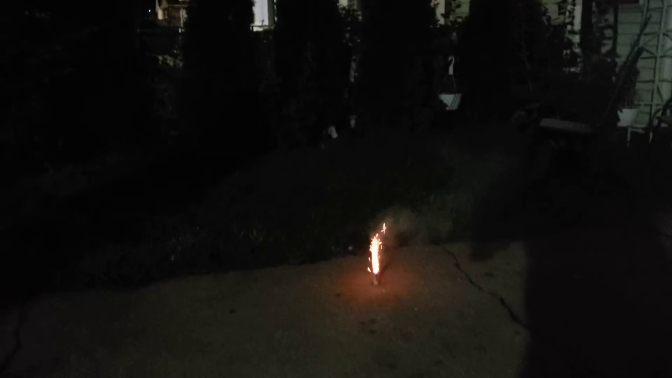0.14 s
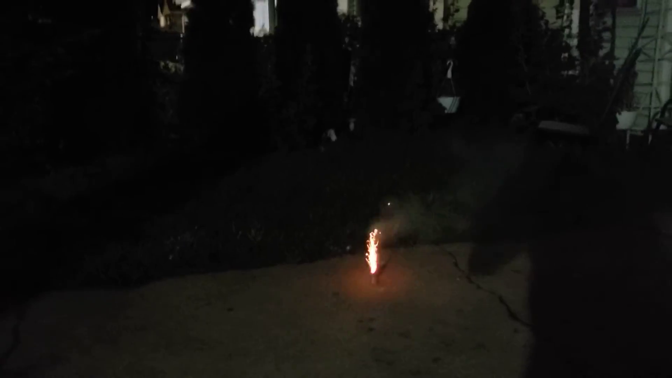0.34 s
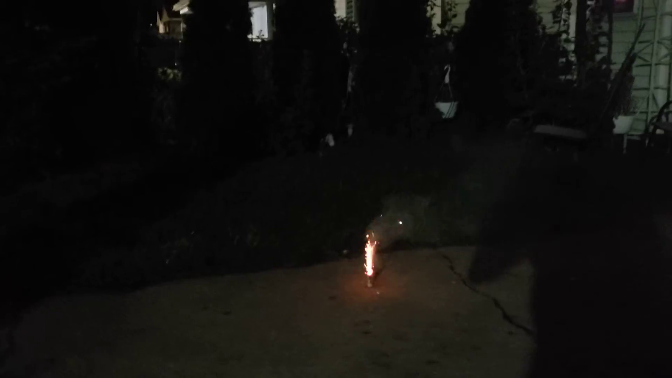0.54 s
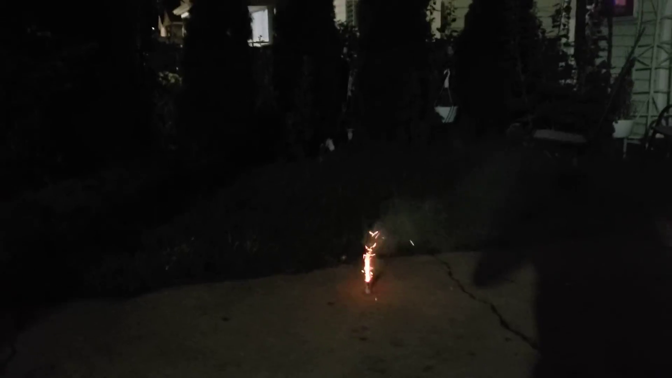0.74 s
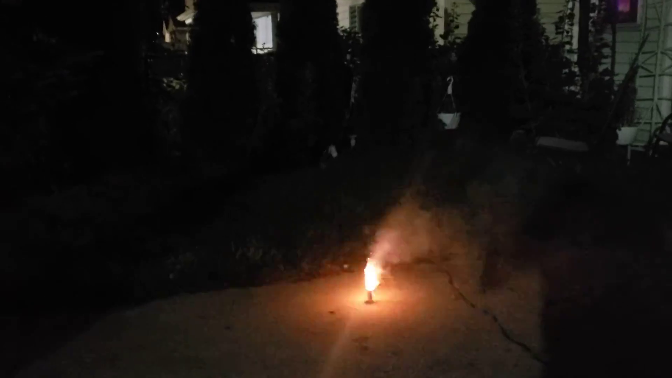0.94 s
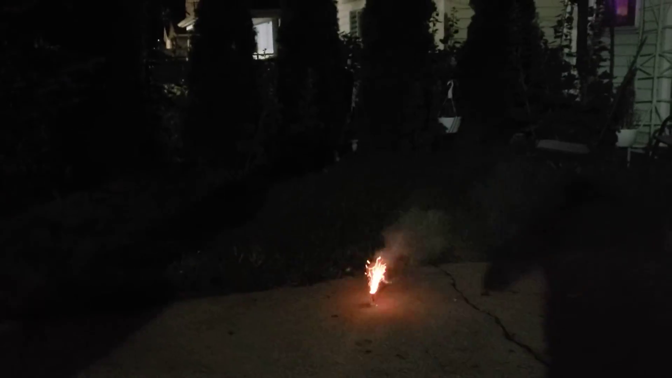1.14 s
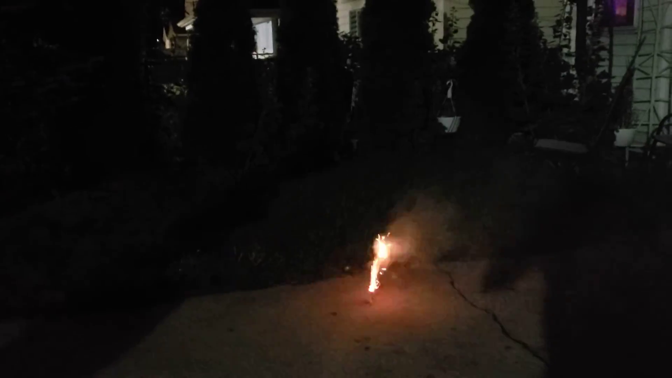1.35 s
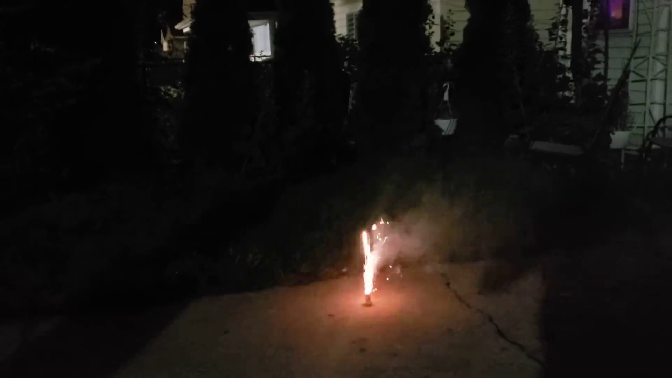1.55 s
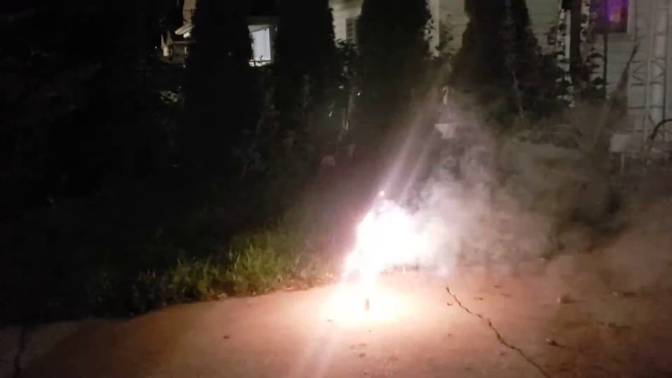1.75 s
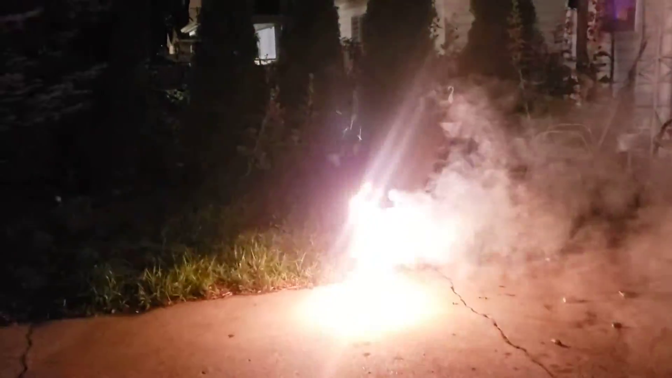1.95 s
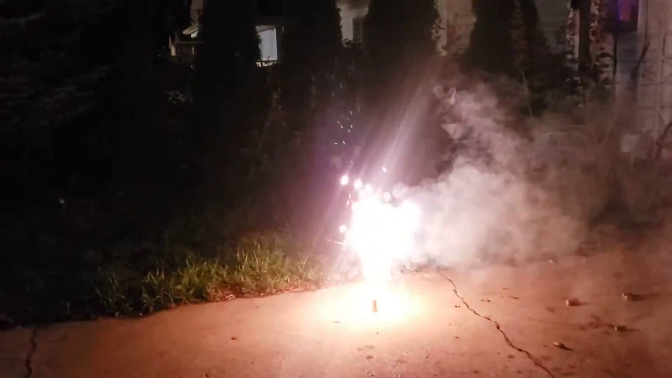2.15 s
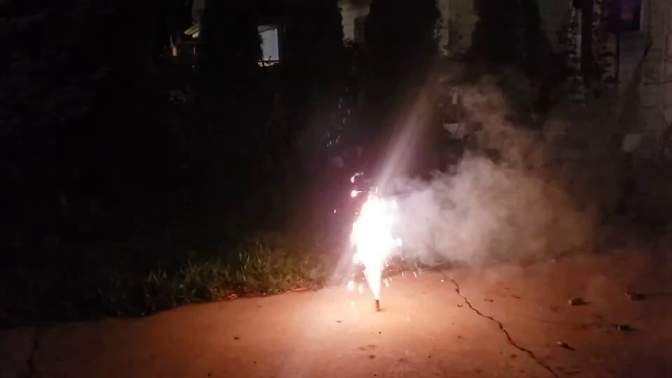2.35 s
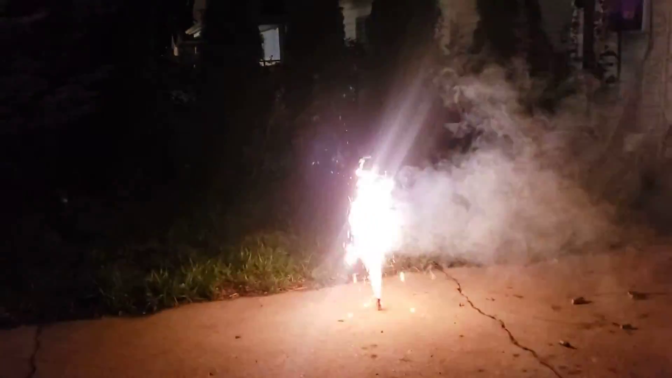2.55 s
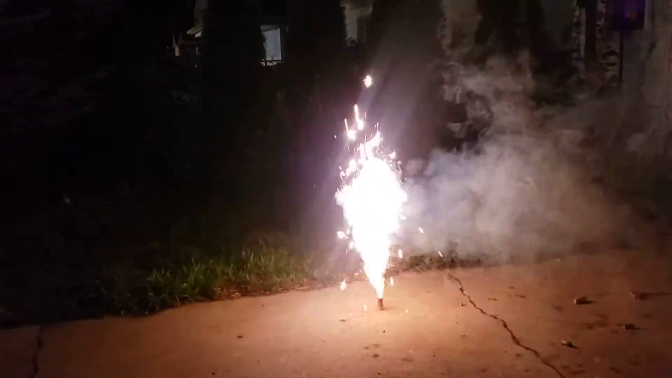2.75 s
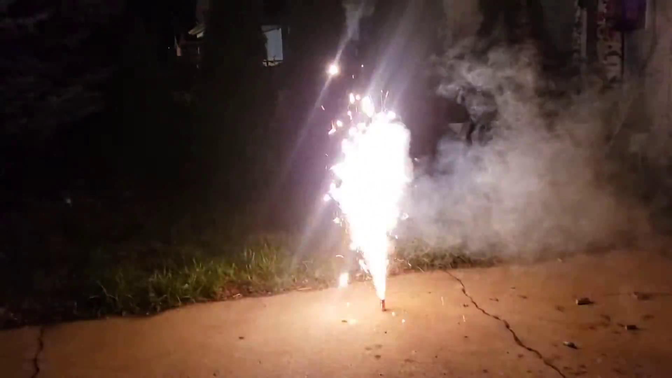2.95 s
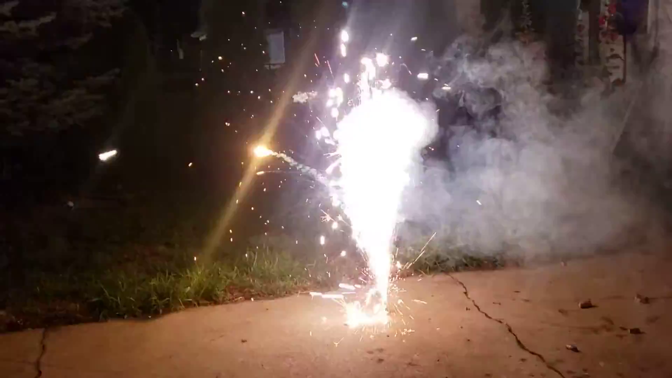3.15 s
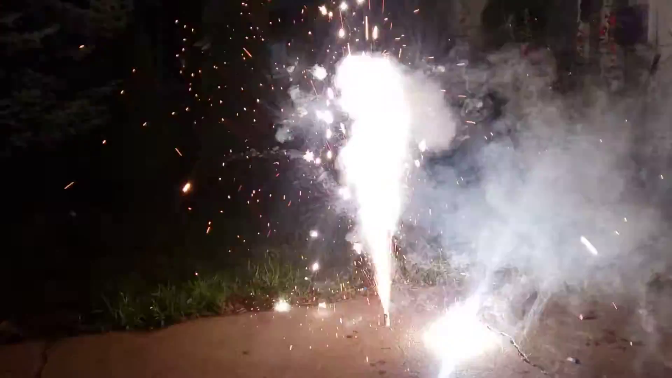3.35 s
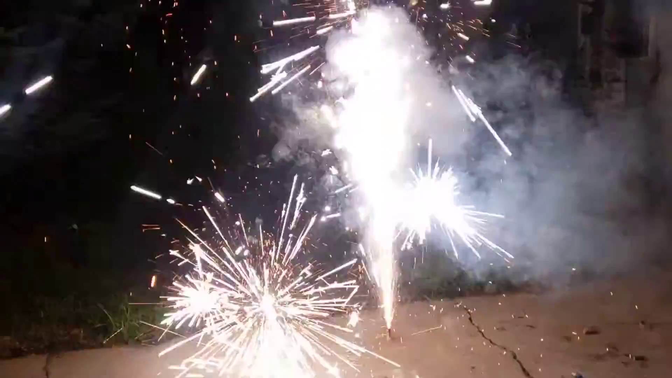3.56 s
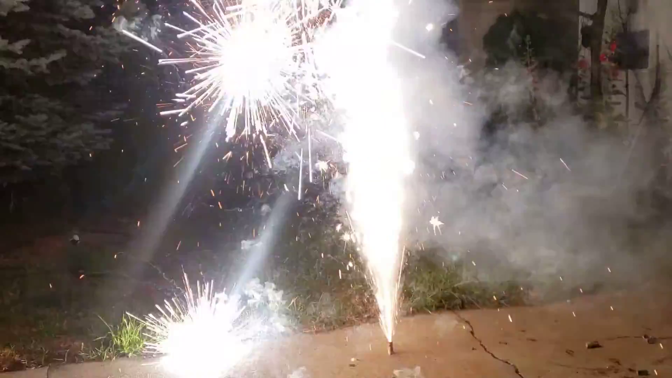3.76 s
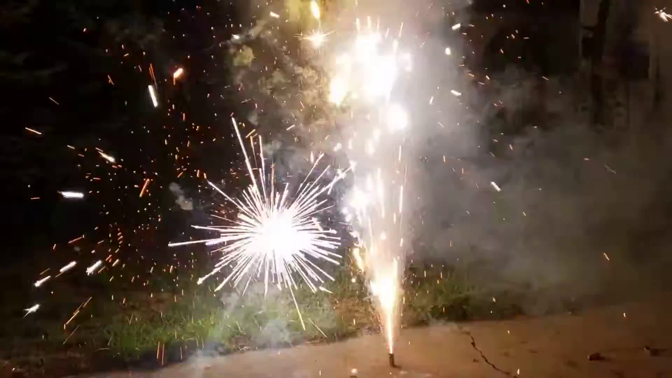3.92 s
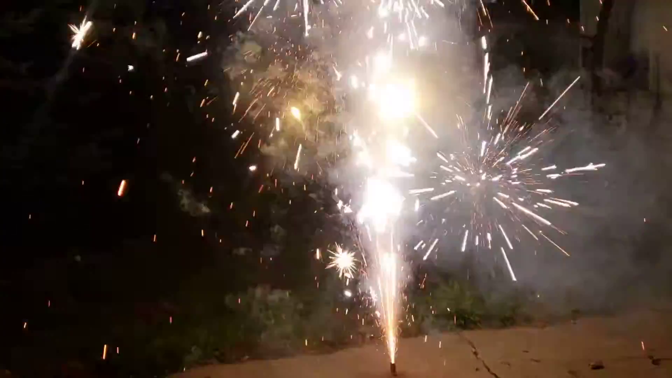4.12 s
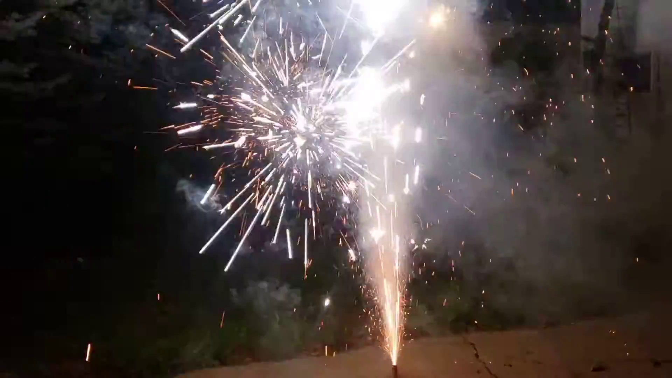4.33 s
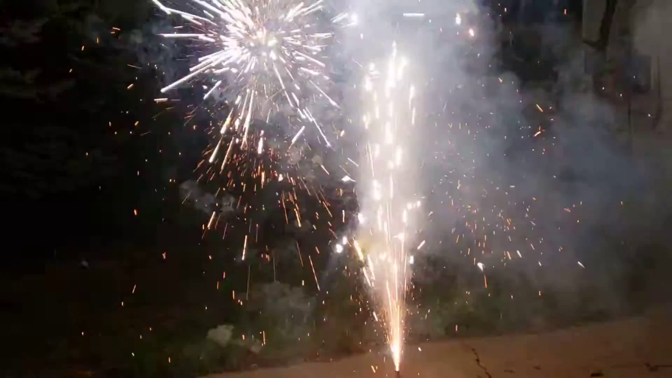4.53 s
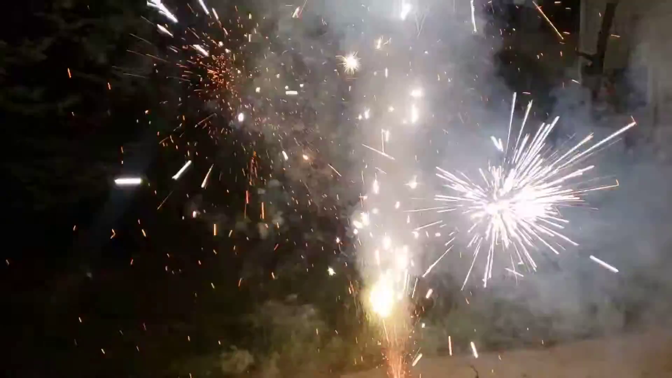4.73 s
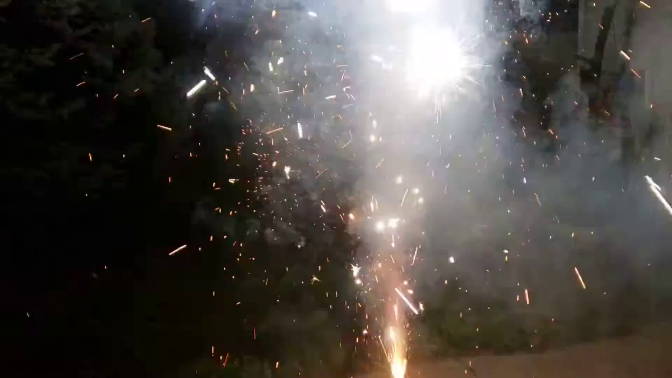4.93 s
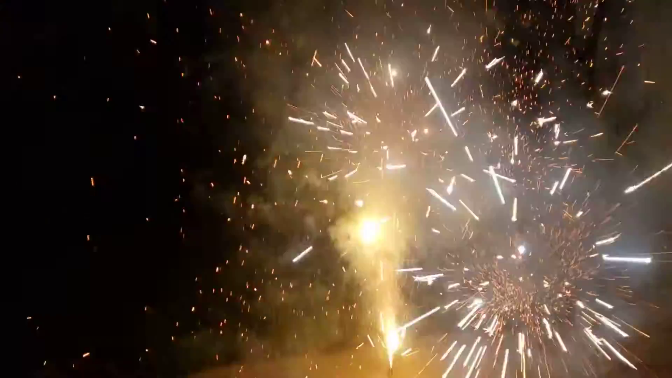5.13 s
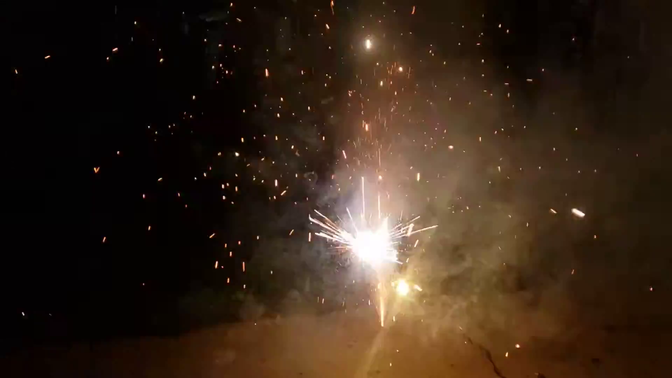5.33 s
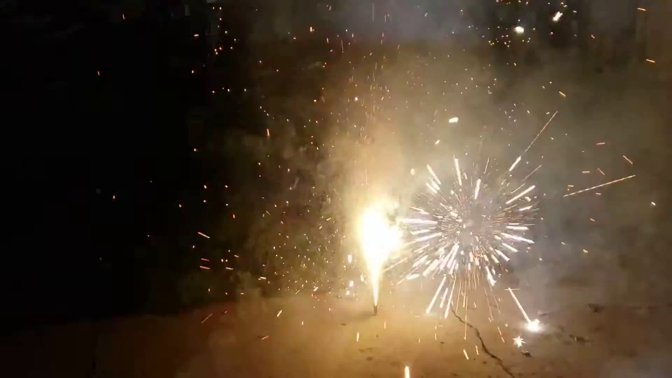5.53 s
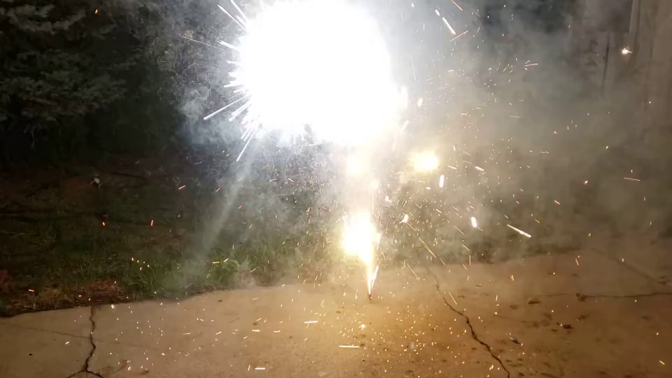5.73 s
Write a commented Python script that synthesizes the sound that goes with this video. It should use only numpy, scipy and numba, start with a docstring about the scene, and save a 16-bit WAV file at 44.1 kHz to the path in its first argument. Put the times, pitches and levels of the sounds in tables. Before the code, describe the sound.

A small fountain firework hisses faintly at night, ticks and snaps a little, then erupts into a dense, loud barrage of sharp crackling bursts.

```python
"""A small fountain firework on a concrete drive at night, a few metres from a phone with two microphone ports.
From the start its jet hisses (coloured noise, strongest after 3 s) over a low distant rumble, with a few
early cracks; bright ticks of noise follow from 1.6 s. From 2.3 s stars burst overhead: sharp clicks that
thicken into a barrage, echoing off the ground and house fronts. Two deep thumps, filtered pressure steps,
jolt the ports at 3.3 s and 5 s."""
import sys
import numpy as np
from scipy import signal
from scipy.fft import rfft, irfft
from scipy.io import wavfile
from scipy.ndimage import uniform_filter1d, minimum_filter1d
from numba import njit

SR = 44100
rng = np.random.default_rng(int(sys.argv[2]) if len(sys.argv) > 2 else 0)


def bounce(signal):
    """Save signal as a 16-bit WAV file at the path given by the first command-line argument."""
    frames = np.transpose(np.atleast_2d(signal))
    limited = np.clip(frames, -1, 1)
    pcm = np.round(limited * 32767).astype(np.int16)
    wavfile.write(sys.argv[1], SR, pcm)


N = 259535  # samples in the scene


def undb(db):
    """Turn a level in dB into an amplitude factor."""
    return 10 ** (np.asarray(db) / 20)


def unit(x):
    """Scale to an rms of 1 over all channels."""
    return x / np.sqrt(np.mean(x ** 2))


def over_time(table):
    """Draw straight lines in dB through the columns of a table whose first column is t/s."""
    s, *columns = np.transpose(table)
    return [np.interp(np.arange(N) / SR, s, column) for column in columns]


def colour(x, spectrum):
    """Causal minimum-phase filter whose gain follows (f/Hz, level/dB) points, by folding the cepstrum."""
    size = 4096
    hz, db = np.transpose(spectrum)
    grid_hz = np.maximum(np.arange(size // 2 + 1), 1) * SR / size
    log_gain = np.interp(np.log(grid_hz), np.log(hz), db) * np.log(10) / 20
    cepstrum = irfft(log_gain)
    cepstrum[1:size // 2] *= 2
    cepstrum[size // 2 + 1:] = 0
    response = irfft(np.exp(rfft(cepstrum)))
    return signal.fftconvolve(x, response[None], axes=1)[:, :x.shape[1]]


def tilt(x, hz, db):
    """Raise or lower what lies above hz."""
    body = signal.sosfiltfilt(signal.butter(2, hz, fs=SR, output="sos"), x)
    return body + (x - body) * undb(db)


def walk(rate):
    """Random levels held 1 / rate s and slewed twice; rms 1."""
    hold = int(SR / rate)
    steps = np.repeat(rng.standard_normal(N // hold + 1), hold)
    return unit(uniform_filter1d(uniform_filter1d(steps, hold), hold)[:N])


def ports(alike_hz):
    """Noise at two ports: shared below alike_hz, unrelated above."""
    shared, own = rng.standard_normal(N), rng.standard_normal((2, N))
    low = signal.butter(1, alike_hz, fs=SR)
    return signal.lfilter(*low, shared - own) + own


def add(train, s, size):
    """Put clicks of the given sizes into a train."""
    np.add.at(train, np.clip((s * SR).astype(int), 0, N - 1), size)


# course of the burn: t/s, jet hiss level/dB, level/dB of its treble against its body,
# flame roar level/dB, level/dB of the roar's upper half against its lower
BURN_COURSE = [(0, -32, -14.5, -51.5, -2), (.6, -43, 4.5, -52, -2), (.9, -37, 2, -47.5, -2),
               (1.2, -47.5, 11.5, -51.5, -2), (1.6, -37, -1.5, -51.5, 2), (1.95, -37, 1.5, -37.5, -11.5),
               (2.06, -41, 4, -46, -7), (2.6, -38, 0, -44, -0.5), (3.06, -31, -1.5, -38, 2.5),
               (3.15, -26.5, -1, -41.5, 3), (3.6, -32, -9, -73, -16), (5.89, -27, -16, -46, 10)]
# spectrum of the gas hiss: f/Hz, relative level/dB
HISS_SPECTRUM = [(1500, -25), (2850, -9.5), (3700, -5.5), (4600, 1), (7500, 1.5), (9500, -6), (12100, 3),
                 (14000, 2.5), (15700, 4.5)]
# spectrum of the flame roar: f/Hz, relative level/dB
ROAR_SPECTRUM = [(150, -23), (250, -7.5), (390, -4.5), (530, -6.5), (710, -4.5), (900, -10.5), (1330, -4),
                 (1520, -11), (1710, -7), (2220, -5.5), (2850, -18.5), (4000, -38)]


def jet():
    """Hot gas hisses out of the nozzle, sputtering with sparks; the flame roars below it."""
    hiss_db, treble_db, roar_db, upper_db = over_time(BURN_COURSE)
    sputter = undb(-2.3 * np.log(1 - rng.random(N)))  # a random gain on every sample
    hiss = unit(colour(ports(1900) * sputter, HISS_SPECTRUM))
    flicker_db = .3 * walk(6) + 1.6 * walk(30)
    hiss *= undb(flicker_db + np.array([[-2.5], [2.5]]))  # stronger on the right
    roar = unit(colour(ports(1100), ROAR_SPECTRUM))
    flutter_db = 1.3 * walk(24.94)
    roar *= undb(flutter_db + np.array([[.7], [-.7]]))  # slightly stronger on the left
    return tilt(hiss, 5340, treble_db) * undb(hiss_db) + tilt(roar, 880, upper_db) * undb(roar_db)


# spectrum of the distant rumble: f/Hz, relative level/dB
RUMBLE_SPECTRUM = [(15, -13), (25, -28), (52, -3.5), (75, 2), (124, 0), (173, -7), (390, -20), (660, -120)]
# the rumble sinks under the cracks: t/s, level/dB
RUMBLE_COURSE = [(3.1, -41), (3.5, -46.5)]


def rumble():
    """Distant low noise, nearly alike at both ports, wandering slightly in level."""
    level_db, = over_time(RUMBLE_COURSE)
    noise = unit(colour(ports(680), RUMBLE_SPECTRUM))
    return noise * undb(level_db + 1.0 * walk(13) + np.array([[.6], [-.6]]))


GROUND_DB, GROUND_SPREAD_DB = .5, 5  # echo off the concrete against the direct crack
KNOCK_HZ = 3150  # the knock of a burst lies below this, its snap above


def bursts(s, db, echo_ms, knock_db, lag_s, pan_db, front_s):
    """Each burst is a pressure jump and its rebound, heard directly, off the ground and off the hand."""
    snap, knock = np.zeros((2, 2, N))
    chance = rng.random((len(s), 10)).T
    rebound_s = front_s * (.5 + chance[9])
    for port, sign in enumerate((1, -1)):
        side = sign * (chance[0] - .5)  # random place between the ports
        direct = s + lag_s * side
        size = undb(db + pan_db * side - .5 * sign)
        ground = direct + echo_ms / 1000 + lag_s * (chance[1 + port] - .5)
        ground_size = size * undb(GROUND_DB + GROUND_SPREAD_DB * (chance[3 + port] - .5))
        hand = direct + 0.0015 * (.2 + chance[5 + port])
        hand_size = size * .5 * chance[7 + port]
        for when, gain in ((direct, size), (ground, ground_size), (hand, hand_size)):
            for train, share in ((snap, undb(-knock_db / 2)), (knock, undb(knock_db / 2))):
                add(train[port], when, gain * share)
                add(train[port], when + rebound_s, -.6 * gain * share)
    # lows from the knock, highs from the snap
    return snap + signal.lfilter(*signal.butter(2, KNOCK_HZ, fs=SR), knock - snap)


def afterglow(train, t60, delay_s):
    """Envelope of the energy that each click leaves behind, swelling over delay_s and dying with t60."""
    power = np.mean(train ** 2, axis=0)
    for keep in (10 ** (-6 / (t60 * SR)), np.exp(-1 / (delay_s * SR))):
        power = signal.lfilter([1 - keep], [1, -keep], power)
    return np.sqrt(power)


# bursting stars: t/s, nominal peak level/dB ahead of the limiter, ground echo delay/ms (longer for
# higher stars), level/dB of knock against snap, relative level/dB of the fizz that follows
STAR_BURSTS = [(0.053, -27.5, 2.7, 13, 13), (0.2337, -31.5, 5.4, -10, 17), (0.271, -35, 1.4, -12, -4),
               (2.2771, -19, 1.7, 5.5, 1), (2.4896, -13.0, 1.16, 0, 3), (2.502, -17.5, 0.87, -6.5, -8),
               (2.731, -14.5, 1.03, 0, 5.5), (2.908, -13.5, 1.9, 1, -1), (2.9669, -12, 1.66, 1.5, 0),
               (3.1354, -8.5, 1.6, -3, -9), (3.148, -20, 1.4, -8, 3), (3.1534, -16, 2.3, -11, 16),
               (3.198, 2.5, 1.7, -1.5, -9), (3.2113, -10.5, 1.0, -7, 21), (3.2715, -8, 1.3, -2, -6),
               (3.294, -5, 0.8, -6.5, 4), (3.308, -6, 1.7, -5, 12), (3.3557, 3.5, 4, 1, 0.5),
               (3.369, -3, 2.0, -5, 1), (3.3958, 8, 1.53, -3, 1.5), (3.4075, 8.5, 2.4, -1, -8),
               (3.4391, 9, 2.84, 4.5, 0.5), (3.452, 0, 1.8, 9, -4), (3.4579, -3.5, 1.6, -5, -2),
               (3.5019, 5.5, 1.58, 5.5, -2), (3.5215, 4.5, 3, -7, 1.5), (3.5905, 8.5, 2, 3.5, -2),
               (3.601, 11, 4.1, 3.5, 5), (3.608, 5, 2.6, 6, 4), (3.6299, 10.5, 3.5, 1.5, -1),
               (3.6642, 0.5, 1.46, 12, 11), (3.672, 7, 2.14, 3, -1), (3.6837, 10, 0.62, 5, -1),
               (3.7034, 5, 8.8, 2, 1), (3.756, -6, 2.6, -2, 4), (3.7651, 12, 2.9, 1, -6),
               (3.779, 8, 2.5, 3, 0.5), (3.809, 12, 3.5, 2.5, -3), (3.8303, 10.5, 3.6, 0, 6.5),
               (3.8544, 7.5, 4.4, -3, 8), (3.8783, 11, 2, 4, 2), (3.882, 17, 4.8, -2.5, -3),
               (3.8964, 13.5, 2.6, -0.5, 2), (3.912, 10.5, 4.7, 3, 7), (3.918, 5, 3.7, 7, 6),
               (3.928, 10.5, 2.4, -2, 4), (3.952, 11, 1.6, 2, 4.5), (3.9652, 10, 6.6, -6, 3.5),
               (3.9815, 5.5, 1.7, 0, 4), (3.9922, 11.5, 3.2, -5, 5.5), (4.0247, 12, 1.56, -1.5, 0),
               (4.0563, 10, 2.14, -2, -2), (4.081, 6.5, 3.9, 2.5, 3.5), (4.1211, 8, 1.65, 1, -1),
               (4.1283, 6.5, 4.6, -4, -1.5), (4.143, 8.5, 2.8, -2.5, 4), (4.161, 3, 2.8, -3, 9),
               (4.1722, 11, 3.8, 2, -4), (4.18, 11.5, 3.9, 2, 1), (4.217, 1, 0.84, -3, -5),
               (4.221, 6.5, 1.4, 2, 0), (4.228, 8, 2.6, 0, 8), (4.251, 6.5, 3.4, 1, 0.5),
               (4.2822, 1.5, 0.92, 1, 7.5), (4.2887, 9, 4.7, 6, -10), (4.311, 12.5, 1.55, 4, 3),
               (4.3309, 10, 2.14, 0, 3.5), (4.344, 9, 4.2, 3, 1.5), (4.3769, 5, 3.4, 1, -1),
               (4.396, 4.5, 2.14, 0, 4.5), (4.405, 7, 2.1, -1, -1), (4.4483, 13.5, 2.13, 3, -2.5),
               (4.4716, 11.5, 3.1, -4, 1), (4.478, 12, 1.27, 0, -7), (4.4874, 8, 4.7, -5, 0),
               (4.5075, -1, 1.0, -6, -5), (4.5105, 9, 3.3, -3, 6), (4.521, 11.5, 5.2, 1, 2.5),
               (4.525, 3, 4.5, 8, 0), (4.5372, 3, 4.2, -3, 0), (4.5553, 3.5, 3.8, 2, 1.5),
               (4.583, 9, 2.44, 2.5, -1), (4.611, 11.5, 3.2, 1, 2), (4.617, 3.0, 2.2, 6, 4),
               (4.6269, 6, 3, -1.5, 1), (4.642, 5, 8.4, 0, 5), (4.6666, 9.5, 4.0, -1.5, 0),
               (4.678, 7, 2.6, 2, -3), (4.6992, 11, 2.2, 2, -1), (4.7149, 8.5, 3.2, 5, 7),
               (4.7176, 8, 2.2, -5.5, -8), (4.73, 8, 3.0, -2, -11), (4.7615, 8, 4.1, 3.5, -2),
               (4.781, 5, 5.1, -3, 12.5), (4.7939, 3.5, 2.1, -7, -10), (4.83, 3.5, 5.3, -2, 8),
               (4.8382, 4.5, 4, 1.5, -0.5), (4.85, 7, 2.9, 2, -2), (4.8674, 3, 2.6, 1, 2),
               (4.9161, 6.5, 4.5, 5, 8.5), (4.9215, 8.5, 2.85, 4, -11), (4.9243, 5, 2.24, -4, -8),
               (4.94, 4, 2.0, -3, -11), (4.9732, 6.5, 0.87, 2, 5), (4.98, 0, 3.7, 7, -4),
               (4.995, 8.5, 3.4, 2, 4.5), (5.003, 5.5, 2.4, 10, 4), (5.0461, 3.5, 1.2, -1.5, 0),
               (5.0686, 6, 4.5, 3, 8.5), (5.0791, 11, 4.5, 0, -8), (5.084, 5, 2.4, 12, -5),
               (5.094, 9, 2.5, 3.5, 1.5), (5.1084, 9.5, 3.6, 3, -7), (5.1472, 9.5, 2.1, 3, 2),
               (5.152, 5, 3.2, 5, -1), (5.164, 14.5, 3, 3, -5), (5.1784, 5.5, 1.93, 6, 0.5),
               (5.2073, 10.5, 4.6, 2, 2), (5.216, 7, 2.4, 8, -7), (5.2273, 10, 2.5, 2, -8),
               (5.241, 15, 2.8, 0.5, -5.5), (5.2823, 2, 1.27, 6, 0.5), (5.3343, 2, 1.6, -8, -10),
               (5.34, -4, 0.92, 7, -6), (5.3456, 6.0, 3, 5.5, 2), (5.3614, 13, 2.6, -4.5, -3.5),
               (5.3711, 9, 2.15, 2, -9), (5.4592, -2, 1.2, -2, -2), (5.4863, 2.5, 1.05, 0, 7),
               (5.497, 8, 2.46, 5.5, -6), (5.508, 6, 2.3, 4, 2), (5.5183, 6, 2.5, 3, 0),
               (5.5397, 8, 2.8, 3, -3.5), (5.569, 12, 2.2, -0.5, 1), (5.5814, 10, 5.4, 8, -6),
               (5.6113, 11, 0.95, 6, 2), (5.6448, 8.5, 2.2, 3.5, 0.5), (5.6743, 9, 3.64, 5.5, 1),
               (5.6853, 10.5, 2.44, 4.5, -0.5), (5.7327, 11, 1.7, 1, -1), (5.745, 4, 1.4, 3, -2),
               (5.758, 15, 2.56, 3.5, -5), (5.7739, 12, 1.9, 1.5, 0.5), (5.8, 16.5, 3.1, 5.5, 1.5),
               (5.8056, 2, 1.9, 4, 0), (5.8114, 4.5, 2, -3, -6), (5.8412, 8, 3.4, 3, -2),
               (5.86, 10, 3.3, 2, -1), (5.88, -2, 2.5, 0, 0)]
# spectrum of a crack: f/Hz, relative level/dB
CRACK_SPECTRUM = [(90, -33.5), (230, -0.5), (480, -1), (700, 2.5), (1000, 0), (1400, 3), (2350, 2.5),
                  (3500, 0.5), (5300, 6.5), (6500, 5), (9000, -4), (11800, 5), (16000, 0.5)]
FRONTS_S = 0.0044  # detour by the nearest house front
TAIL_HZ = 11300  # far echoes come back duller


def stars():
    """The cracks; each fizzes on in faint crackles and echoes from lawn, shrubs and house fronts."""
    s, db, echo_ms, knock_db, fizz_db = np.transpose(STAR_BURSTS)
    cracks = bursts(s, db, echo_ms, knock_db, lag_s=.0001, pan_db=-9.5, front_s=0.00025)
    # small crackles all through the scene, heard only inside the tails
    when, size, height, body = rng.random((6000, 4)).T
    crackles = bursts(when * N / SR, -2.0 * np.log(1 - size), 4 * height, 16 * (body - .5),
                      lag_s=.0002, pan_db=8, front_s=.0002)
    embers = np.zeros((1, N))
    add(embers[0], s, undb(db + fizz_db))
    late = np.pad(afterglow(embers, 0.13, 0.0074), (int(FRONTS_S * SR), 0))[:N]
    # echoes blur into noise, with small crackles in it
    tail = late * (undb(-4.5) * ports(1100) + undb(3.5) * crackles)
    wet = cracks + signal.lfilter(*signal.butter(1, TAIL_HZ, fs=SR), tail)
    wet += undb(-10) * afterglow(cracks, .010, .0003) * ports(1700)  # short blur right behind each crack
    # the peak of a crack is its swing over its loudest third of a millisecond
    click = colour(np.eye(1, 2048), CRACK_SPECTRUM)
    peak = np.sqrt(2 * uniform_filter1d(click ** 2, size=13).max())
    return colour(wet, CRACK_SPECTRUM) / peak


# thin bright ticks of sparks at the nozzle: t/s, onset level/dB of the noise before its high-pass
SPARK_TICKS = [(1.6207, -26), (1.8423, -24), (1.9999, -34), (2.1226, -18), (2.156, -19), (2.1962, -25),
               (2.616, -19), (2.8669, -31)]
SPARK_HZ, SPARK_T60_S = 7100, 0.0049  # high-pass corner, time to die by 60 dB


def sparks():
    """Each tick is a few milliseconds of treble noise."""
    s, db = np.transpose(SPARK_TICKS)
    onsets = np.zeros(N)
    add(onsets, s, undb(db))
    decay = 10 ** (-3 / (SPARK_T60_S * SR))
    shape = signal.lfilter([1], [1, -decay], onsets)
    return signal.lfilter(*signal.butter(2, SPARK_HZ, "high", fs=SR), shape * ports(8500))


# pressure steps of the thumps: t/s, left step, right step [amplitude before filtering]
THUMP_STEPS = [(3.2939, -0.85, 2.24), (4.9713, 0.92, 1.33)]
THUMP_HZ, THUMP_WIDTH_HZ, LOW_CUT_HZ, THUMP_EDGE_HZ = 53, 35, 62, 2000


def thumps():
    """A pressure step at each port that the low cut of the phone lets swing back and ring."""
    steps = np.zeros((2, N))
    for s, left, right in THUMP_STEPS:
        steps[:, int(s * SR):] += np.array([[left], [right]])
    ring, cut = 2 * np.pi * THUMP_HZ, 2 * np.pi * LOW_CUT_HZ  # rad/s
    ring_poles = np.roots([1, 2 * np.pi * THUMP_WIDTH_HZ, ring ** 2])
    cut_poles = np.roots([1, 1.0 * cut, cut ** 2])
    swing = signal.bilinear_zpk([0] * 4, np.r_[ring_poles, cut_poles], 1, SR)
    ringing = signal.sosfilt(signal.zpk2sos(*swing), steps)
    return signal.lfilter(*signal.butter(2, THUMP_EDGE_HZ, fs=SR), ringing)  # soften the edge


def scene():
    """Jet, rumble, stars, sparks and thumps together at the two ports."""
    return jet() + rumble() + stars() + sparks() + thumps()


@njit
def recover(gain, rate):
    """The gain falls at once and climbs back slowly."""
    out, g = np.empty(len(gain)), 1.
    for i in range(len(gain)):
        g = min(gain[i], g + rate * (gain[i] - g))
        out[i] = g
    return out


LIMIT_DB, LIMIT_RATIO, RELEASE_S, AHEAD_S = -3, 1.413, 0.88, .008
TOP_HZ = 15850  # upper edge of the phone's sound


def record(dry):
    """A gentle look-ahead limiter ducks all around loud cracks; peaks are rounded; the phone cuts the top."""
    ahead = int(AHEAD_S * SR)
    peak = np.abs(dry).max(axis=0) + 1e-9  # the louder port steers both
    want = np.minimum(1, undb(LIMIT_DB) / peak) ** (1 - 1 / LIMIT_RATIO)
    early = minimum_filter1d(want, ahead, origin=-(ahead // 2))
    held = recover(early, 1 / (RELEASE_S * SR))
    gain = uniform_filter1d(held, ahead, origin=(ahead - 1) // 2)
    rounded = np.tanh(1.05 * dry * gain) / 1.05
    top_cut = signal.ellip(10, .2, 70, TOP_HZ, fs=SR, output="sos")
    return np.clip(signal.sosfilt(top_cut, rounded), -1, 1)


dry = scene()
out = record(dry)
bounce(out)
```